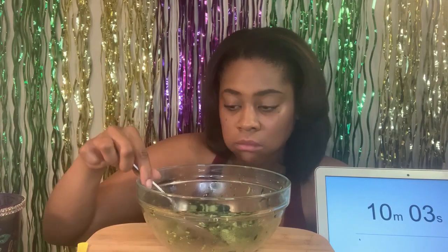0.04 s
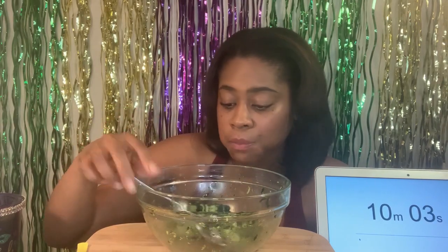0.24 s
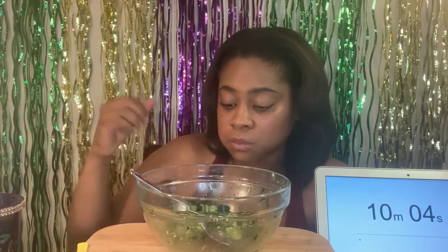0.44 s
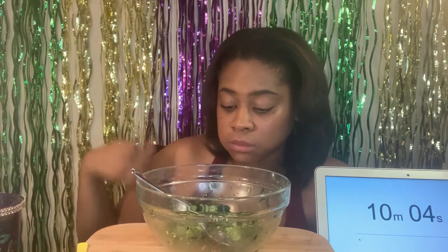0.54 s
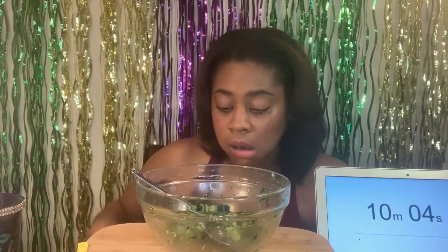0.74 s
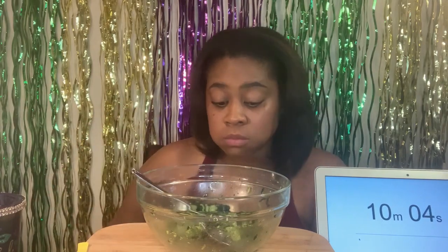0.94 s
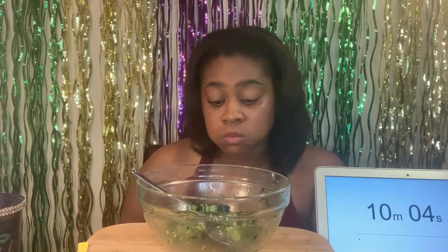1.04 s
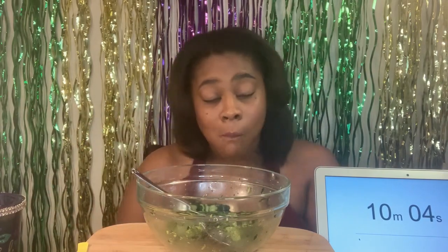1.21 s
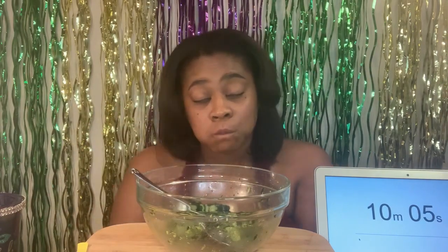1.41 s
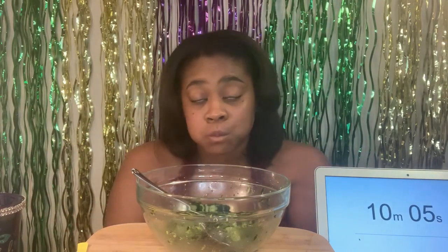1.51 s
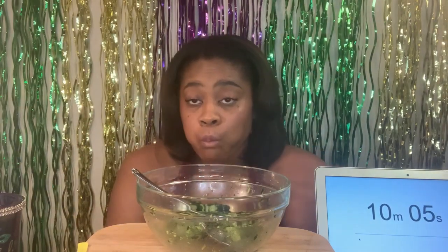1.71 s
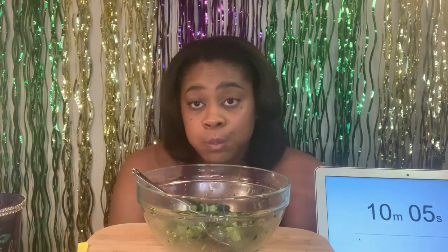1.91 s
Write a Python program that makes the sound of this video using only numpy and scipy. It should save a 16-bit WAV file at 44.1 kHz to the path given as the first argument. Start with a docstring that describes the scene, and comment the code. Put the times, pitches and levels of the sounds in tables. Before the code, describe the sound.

A metal spoon is let go in a large glass bowl, knocking the rim and chattering to rest with a bright ring. Two faint ticks and a soft mouth smack follow over a small room's quiet hiss.

```python
"""A light touch of a spoon on glass fades over a small room's hiss, with a faint crinkle.
Then the metal spoon is let go in a large glass bowl: it knocks the rim, bounces and chatters to rest.
Each contact cracks, clatters and sets the glass, the spoon and the wooden table below ringing.
Two faint ticks on the glass follow, then a soft mouth smack and a last few crinkling clicks."""
import sys
import numpy as np
from scipy import signal
from scipy.fft import rfft, irfft
from scipy.io import wavfile

SR = 44100
rng = np.random.default_rng(int(sys.argv[2]) if len(sys.argv) > 2 else 0)


def file_out(sig):
    """Save sig as 16-bit WAV at sys.argv[1]."""
    # one column per channel
    cols = np.atleast_2d(sig).T
    # limit, then scale
    lim = np.clip(cols, -1, 1)
    pcm = np.round(lim * 32767).astype(np.int16)
    wavfile.write(sys.argv[1], SR, pcm)


N = 85995
T = np.arange(N) / SR
BIN_HZ = np.maximum(np.arange(N // 2 + 1) * SR / N, 1)
LOW_MODES_BELOW_HZ = 600

# the bowl's modes, the upper ones in close clusters: (pitch [Hz], level [dB], t60 [s])
BOWL_MODES = [(435.77, -22.5, 0.43), (1108.5, -31.5, 0.36), (2008.4, -31.5, 0.28), (1996, -28, .27),
              (3059, -26, 0.2), (3083, -20.5, 0.22), (4187, -34, 0.15), (4272, -34, 0.33),
              (4308, -16, 0.083), (4354, -23.5, .14), (5615, -27, 0.15), (5644, -21, 0.15),
              (5650, -23.5, 0.11), (6030, -56, 0.17), (7134, -24.5, 0.207), (7250, -20, 0.073),
              (7420, -52, 0.1), (8700, -20.5, 0.14), (8765, -27.5, 0.18), (10431, -28.5, .22),
              (12260, -43, 0.11), (14220, -33, .16), (15700, -35.5, .15)]
# the spoon's thin ring: (pitch [Hz], level [dB], t60 [s])
SPOON_MODES = [(2530, -36.5, 0.05), (3775, -40.5, 0.067), (7620, -25.5, .16), (7817, -35.5, .28),
               (8020, -29.5, 0.073), (8469, -32.5, 0.068), (10100, -38.5, 0.18), (9750, -36, 0.083),
               (10680, -40, 0.37), (11370, -27, 0.1), (11230, -40, 0.4), (11400, -45, 0.306),
               (12660, -48.5, 0.16), (12900, -50, 0.226), (13370, -31, 0.099), (14830, -44, .12),
               (15350, -32.5, 0.184)]


def from_db(db):
    """Decibels to gain."""
    return 10 ** (np.asarray(db) / 20)


def noise(spectrum):
    """Noise at rms 1, coloured by (frequency [Hz], level [dB]) points."""
    hz, db = np.transpose(spectrum)
    colour = from_db(np.interp(np.log(BIN_HZ), np.log(hz), db))
    low_cut = np.minimum(BIN_HZ / hz[0], 1) ** 2
    x = irfft(rfft(rng.standard_normal(N)) * colour * low_cut, N)
    return x / x.std()


def decay(start, t60):
    """Envelope that jumps to 1 at the start and dies away."""
    return (T >= start) * np.exp(-np.log(1000) * np.clip(T - start, 0, 2 * t60) / t60)


def bursts(events):
    """Envelope of short bursts, each a straight rise and a dying tail."""
    envelope = np.zeros(N)
    for start, rise, t60, db in events:
        attack = np.clip((T - start) / rise, 0, 1)
        envelope += from_db(db) * np.where(T < start + rise, attack, decay(start + rise, t60))
    return envelope


def zones(hz):
    """How far a pitch counts as bass and as treble, 0-1 each."""
    bass = np.interp(np.log2(hz), np.log2([493, 1747]), [1, 0])
    treble = np.interp(np.log2(hz), np.log2([5750, 8600]), [0, 1])
    return bass, treble


def fading_touch():
    """The tail of a light touch of the spoon: a few tones and a wash of noise, already dying."""
    # tones still ringing: (pitch [Hz], level [dB], t60 [s])
    modes = [(191.7, -47.5, 0.29), (4370, -63.5, 0.62), (6750, -56, 0.35), (8300, -50, .26),
             (10760, -44, 0.13)]
    # colour of the wash: (frequency [Hz], level [dB])
    colour = [(59, -29), (100, 11.5), (452, -3), (546, -32), (849, -1.5), (1530, -27), (1660, -6),
              (2920, -3), (3460, -23.5), (4640, 5), (5260, -29.5), (6910, -4), (9260, -18), (11000, -2.5),
              (15000, -25)]
    tones = sum(from_db(db) * decay(0, t60) * np.sin(2 * np.pi * (hz * T + rng.random()))
                for hz, db, t60 in modes)
    return tones + from_db(-43) * decay(0, t60=0.22) * noise(colour)


def room_hiss():
    """A steady bed of room noise, fullest in the bass."""
    # room tone: (frequency [Hz], level [dB])
    colour = [(15, -31), (25, -4), (64, 0), (133, 3.5), (189, -6), (255, -3.5), (307, -10.5), (361, -2),
              (572, -3.5), (654, -5.5), (710, -6), (1090, -11), (1590, -12.5), (1820, -14), (2660, -17.5),
              (4820, -19), (6850, -15), (11700, -19.5), (15800, -28)]
    return from_db(-56) * noise(colour)


def crinkles():
    """Faint crinkling clicks: tiny, sharp bursts of peaky noise."""
    # the clicks: (time [s], rise [s], t60 [s], level [dB])
    clicks = [(.075, 0.00078, 0.039, -52.5), (1.893, 0.0013, 0.063, -52.5), (1.907, .001, 0.036, -53.5),
              (1.919, .001, 0.048, -51.5)]
    # their colour: (frequency [Hz], level [dB])
    colour = [(400, 1), (560, 15.5), (900, -5), (2200, -14), (2480, 8.5), (2800, -19), (3200, 15.5),
              (3600, -6), (4010, 0), (4500, -10), (4800, 6), (5100, 6), (5600, -38), (11000, -20),
              (15500, -16)]
    return bursts(clicks) * noise(colour)


def mode_ring(blows, hz, loss_db, build_up_s):
    """A mode stores the energy of its blows and leaks it away; later blows jolt its phase."""
    first_blow_s = T[np.argmax(blows > 0)]
    surviving = from_db(-np.minimum(loss_db, 2500)) ** 2
    energy = surviving * np.cumsum(blows / surviving) + 1e-20
    fresh_share = np.clip(blows / energy, 0, 1)
    jolts = np.arcsin(np.sqrt(fresh_share)) * rng.choice([-1, 1], N) * (T > first_blow_s)
    swing = np.sqrt(energy) * np.exp(1j * np.cumsum(jolts))
    lag = np.exp(-1 / (build_up_s * SR))   # a ring takes a moment to spread round the bowl
    swing = signal.lfilter([1 - lag], [1, -lag], swing)
    return np.imag(swing * np.exp(2j * np.pi * hz * (T - first_blow_s)))


def struck_bowl(contacts):
    """Contacts and their tiny rebounds ring bowl, spoon and table, most near the struck spot's pitch."""
    # the wooden table's thud: (pitch [Hz], level [dB], t60 [s])
    table_modes = [(113, -46, .2), (122, -38, 0.06), (193.6, -33, 0.16)]
    # the spoon presses on the glass and damps the low modes: (time [s], length [s], loss [dB])
    presses = [(0.268, 0.014, 13), (0.598, 0.0073, 11)]
    touch_loss_db = 1.96   # each contact chokes the upper modes a little
    rebounds_per_s, buzz_db, buzz_t60_s = 300, -10, 0.073
    spot_lift_db, spot_octaves, scatter_db = 5.5, 0.17, 1.5
    times, db, bass_db, treble_db, spot_hz = np.transpose(contacts)
    onsets = (times * SR).astype(int)
    pressed_db = sum(loss * np.clip((T - start) / length, 0, 1) for start, length, loss in presses)
    touched_db = touch_loss_db * np.searchsorted(np.sort(onsets), np.arange(N), side="right")
    rebounds = np.flatnonzero(rng.random(N) < rebounds_per_s / SR)
    since_contact = T[rebounds] - times[:, None]
    buzz = (since_contact > 0) * from_db(buzz_db - 60 * np.abs(since_contact) / buzz_t60_s)
    rings = np.zeros(N)
    for hz, mode_db, t60 in BOWL_MODES + SPOON_MODES + table_modes:
        bass, treble = zones(hz)
        spot_db = spot_lift_db * np.exp(-(np.log2(hz / spot_hz) / spot_octaves) ** 2)
        chance_db = scatter_db * rng.standard_normal(len(times))
        strength = from_db(mode_db + db + bass * bass_db + treble * treble_db + spot_db + chance_db)
        blows = np.zeros(N)
        blows[rebounds] = (1 - bass) * (strength ** 2 @ buzz ** 2)
        blows[onsets] += strength ** 2
        if hz < LOW_MODES_BELOW_HZ:
            rings += mode_ring(blows, hz, 60 * T / t60 + pressed_db, build_up_s=0.004)
        else:
            rings += mode_ring(blows, hz, 60 * T / t60 + touched_db, build_up_s=0.0005)
    # the rings carry no deep bass
    return signal.sosfilt(signal.butter(2, 63.4, "high", fs=SR, output="sos"), rings)


def clatter(contacts):
    """Each contact gives a short crack and a rough wash that gathers round the upper modes."""
    # metal clattering on glass: (frequency [Hz], level [dB])
    colour = [(80, -14), (110, 3.5), (280, 3.5), (400, 3.5), (750, 2.5), (1200, -4.5), (1600, -9.5),
              (2000, -4.5), (2600, -5), (3100, 1), (4300, 0.5), (5100, 0), (5700, 1), (6400, 2.5),
              (7500, -2.5), (8700, 2), (9700, -5), (11200, 4), (13300, -4.5), (14700, -19.5), (16000, -16)]
    half_width_hz, lift_db = 55, 10
    upper_hz = [hz for hz, _, _ in BOWL_MODES + SPOON_MODES if hz > LOW_MODES_BELOW_HZ]
    near_mode = np.max([1 / (1 + ((BIN_HZ - hz) / half_width_hz) ** 2) for hz in upper_hz], axis=0)
    spectrum = rfft(noise(colour)) * from_db(lift_db * (near_mode - 0.5))
    bass, treble = zones(BIN_HZ)
    bands = [irfft(spectrum * share, N) for share in (bass, 1 - bass - treble, treble)]
    band_power = np.zeros((3, N))
    for start, db, bass_db, treble_db, _ in contacts:
        crack = from_db(-18.5) * decay(start, t60=0.017)
        wash = from_db(-23.5) * decay(start, t60=0.3)
        band_power += np.outer(from_db([db + bass_db, db, db + treble_db]), crack + wash) ** 2
    return np.sum(np.sqrt(band_power) * bands, axis=0)


def room_reverb(x):
    """Diffuse reflections of a small room, weak in the bass."""
    tail = rng.standard_normal(N) * decay(start=0.0077, t60=0.32)
    send = signal.sosfilt(signal.butter(1, 470, "high", fs=SR, output="sos"), x)
    return from_db(-9.5) * signal.fftconvolve(send, tail / np.linalg.norm(tail))[:N]


def mouth_smack():
    """A soft smack of the mouth: one puff of noise that swells and dies."""
    # the smack: (time [s], rise [s], t60 [s], level [dB])
    smacks = [(.738, 0.016, 0.16, -49)]
    # its colour: (frequency [Hz], level [dB])
    colour = [(120, -38.5), (200, -38), (455, 6), (1250, -6), (1730, 2), (2090, 0), (3150, 0.5),
              (5180, -44), (6700, -2), (8090, -35), (12000, -12), (15600, -56), (22000, -120)]
    return bursts(smacks) * noise(colour)


def scene():
    """The ringing bowl with its reverb, plus dry clatter and small noises over the room's hiss."""
    # spoon bouncing on glass:
    # (time [s], level [dB], extra bass [dB], extra treble [dB], pitch the struck spot favours [Hz])
    bounces = [(.2255, -7.5, 7, 0, 457), (.2422, -3, 4, -4.5, 5830), (.2577, -8.5, 1.5, -14, 4300),
               (.2770, -9, -13.5, -5, 5700), (.2880, -7.5, -0.5, -15.5, 3500), (.3110, -4, -8, -4.5, 4300),
               (.3215, -6, 9.5, 2, 5700), (.3285, -3.5, 7, 5, 12000), (.3515, -3.5, -4.5, 1, 5800),
               (.3760, -1.5, -5, -6.5, 4300), (.3905, 0, -19, -3, 5160), (.4000, -5.5, -1.5, 7.5, 6850),
               (.4115, -3.5, -0.5, -1, 5200), (.4220, -4.5, -2, -7, 3100), (.4330, -12, -6, 7.5, 3080),
               (.4430, -12.5, 8, -12, 3500), (.4540, -11, -10.5, -6.5, 8700), (.4720, -13, -18, -35, 5700),
               (.4870, -20.5, -6, -3, 8700)]
    # faint late ticks on the glass, same columns
    ticks = [(0.543, -33.5, 12, -14, 4230), (0.677, -41.5, -17.5, -3.5, 4150)]
    contacts = bounces + ticks
    rings = struck_bowl(contacts)
    small_noises = fading_touch() + mouth_smack() + crinkles()
    return (rings + room_reverb(rings) + clatter(contacts) + small_noises + room_hiss())[None]


def record(dry):
    """Soft saturation rounds the peaks and a steep low-pass cuts the very top."""
    ceiling, cutoff_hz = 0.94, 15750
    top_cut = signal.ellip(10, 0.1, 80, cutoff_hz, fs=SR, output="sos")
    return signal.sosfilt(top_cut, ceiling * np.tanh(dry / ceiling))


dry = scene()
out = record(dry)
file_out(out)
```